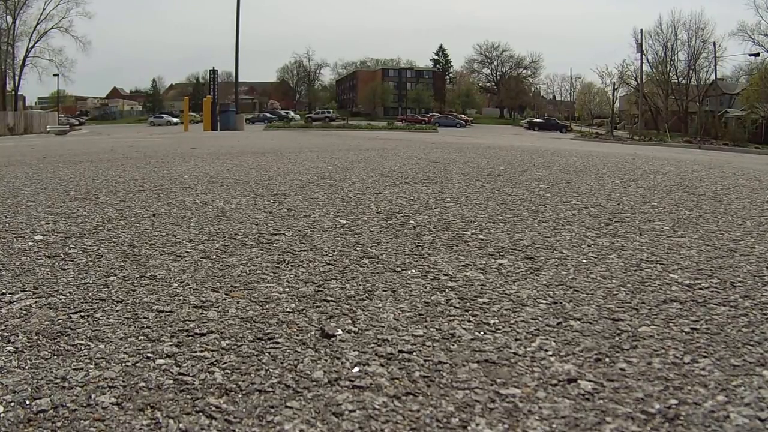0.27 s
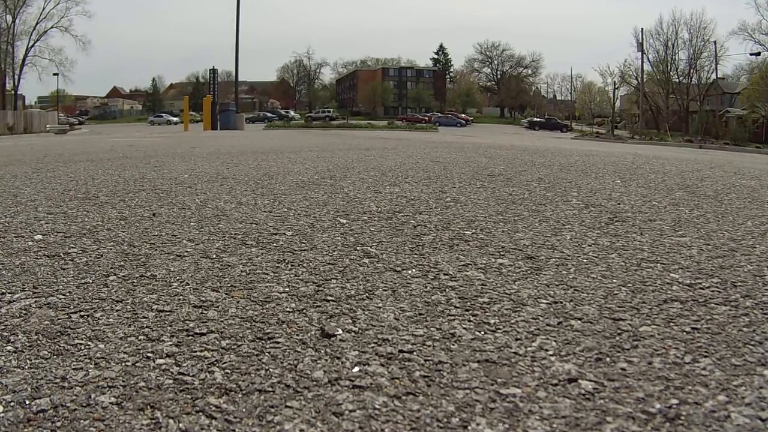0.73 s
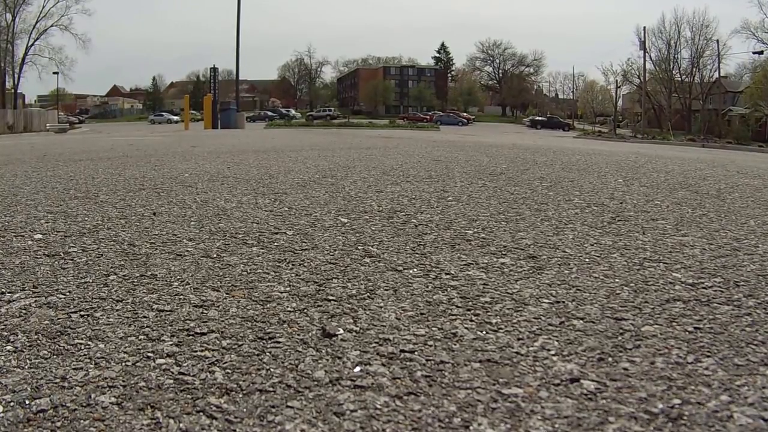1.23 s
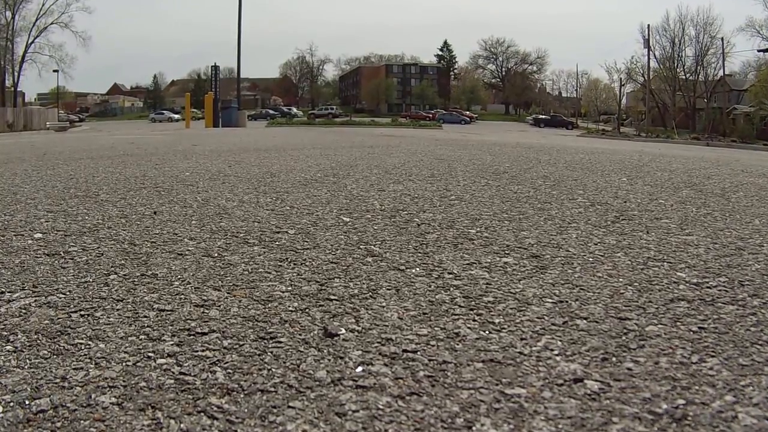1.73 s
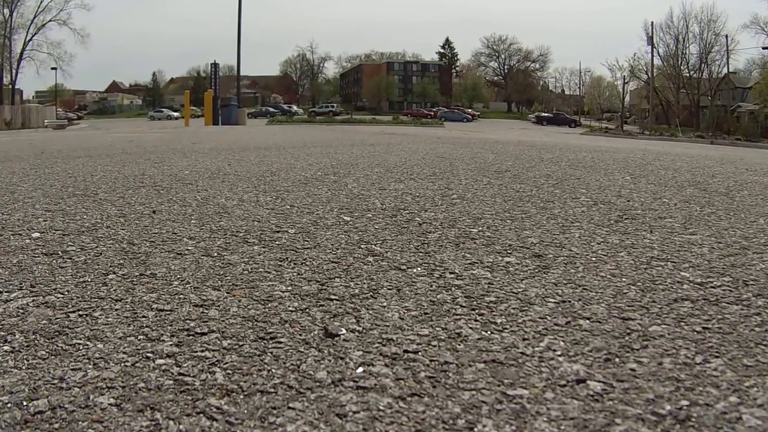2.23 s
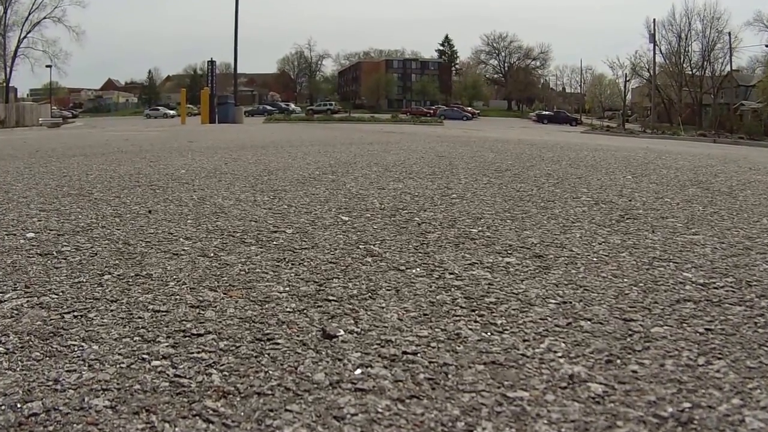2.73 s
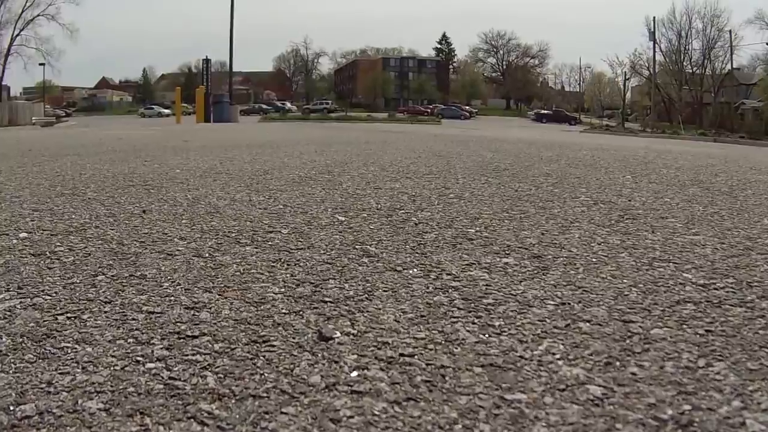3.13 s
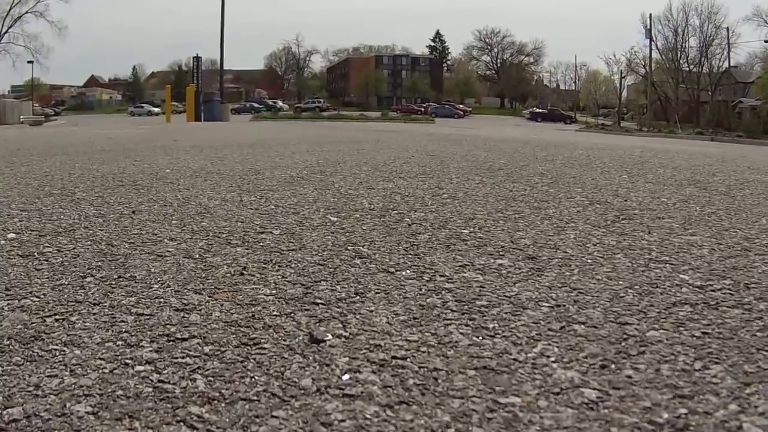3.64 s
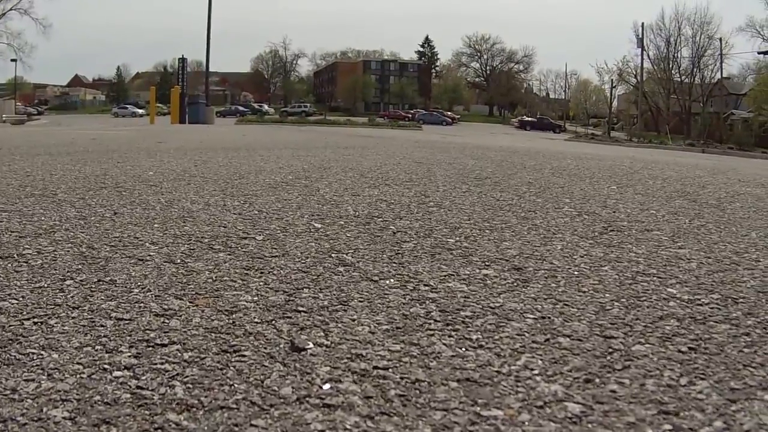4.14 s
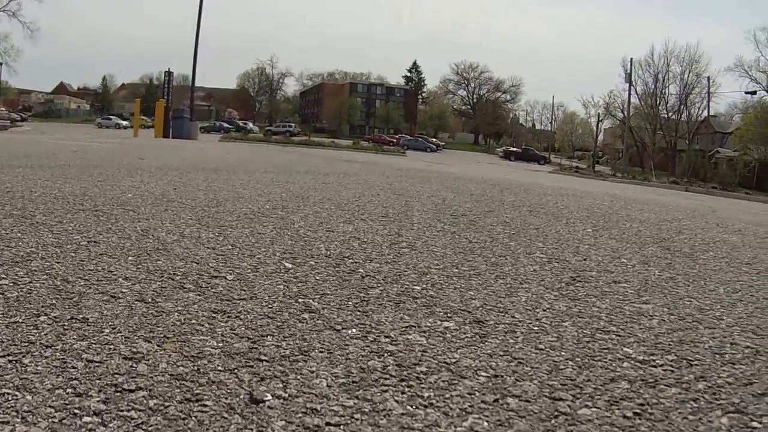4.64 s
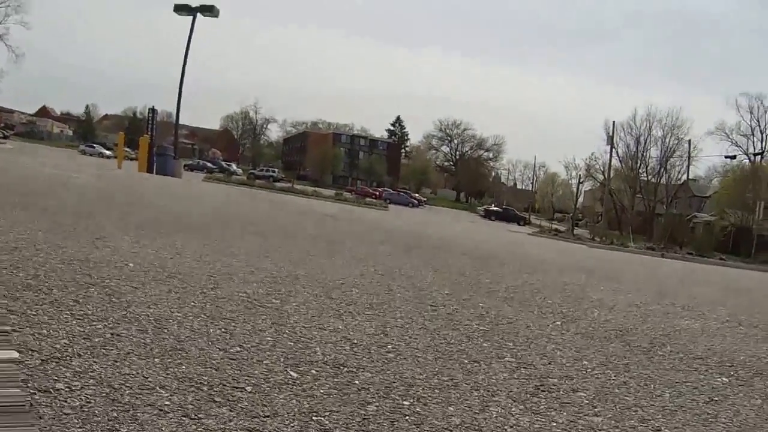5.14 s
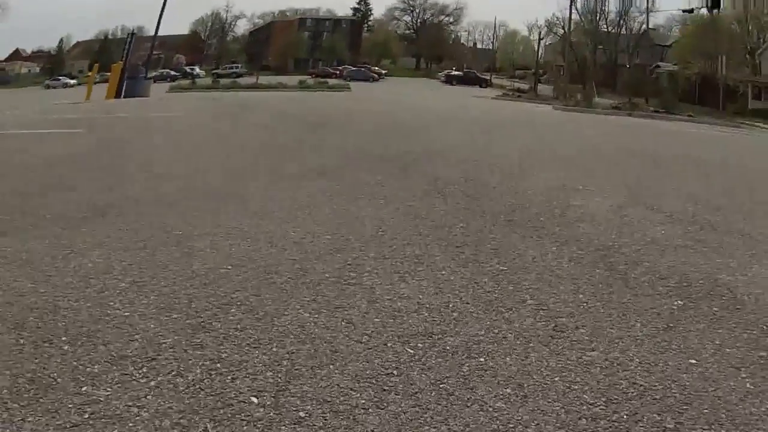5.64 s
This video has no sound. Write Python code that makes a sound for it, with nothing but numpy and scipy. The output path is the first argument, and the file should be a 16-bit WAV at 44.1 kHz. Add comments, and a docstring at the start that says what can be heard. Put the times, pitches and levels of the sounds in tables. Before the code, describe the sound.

For almost two seconds there is only faint outdoor air, with soft low puffs of breeze and very thin electronic tones. At about 1.9 seconds a quadcopter's motors switch on suddenly, right at the microphone, with a shrill whine, quick ticks and a brief grinding. From 2.4 seconds the propellers catch and spin up into a low, hissing buzz that climbs in pitch. It rises again around 3.6 seconds, turning louder and raspier as the blades' air slaps the camera. The pitch peaks at lift-off, about 4.5 seconds, then the drone wavers as the propellers beat against each other. Downwash buffets the microphone with low rumbling gusts, strongest from 4.7 to 5.4 seconds and ending in a sharp pop. The rumble then falls away, while the buzz and high whine carry on until nearly six seconds.

```python
"""An asphalt lot, where a quadcopter starts and lifts off, heard from its own camera.
Four speed controllers switch on with an 8 kHz whine; the motors step round, then spin up, and their
rotation modulates the whine into sidebands. Each pass of the nearest blade radiates a pressure pulse,
a thump, and its wake slaps the camera; the other propellers beat against it. Turbulent downwash
buffets the microphone, most just after lift-off."""
import sys
import numpy as np
from scipy import signal
from scipy.fft import rfft, irfft, next_fast_len
from scipy.io import wavfile
from scipy.ndimage import uniform_filter1d, map_coordinates

SR = 44100
rng = np.random.default_rng(int(sys.argv[2]) if len(sys.argv) > 2 else 0)


def dump(signal):
    """Clip the signal to [-1, 1] and save it as 16-bit WAV at the path in sys.argv[1]."""
    limited = np.clip(np.atleast_2d(signal).T, -1, 1)
    pcm = np.round(limited * 32767).astype(np.int16)
    wavfile.write(sys.argv[1], SR, pcm)


N = 258867

# Levels in the tables are relative. The blade rate is the number of blade passes a second.
# blade rate of the nearest propeller, creeping and then running: t/s, f/Hz
CREEP_RATE = [(1.91, 1.3), (2.0, 6.5), (2.2, 22.3), (2.3, 32), (2.36, 40), (2.4, 59)]
RUN_RATE = [(2.45, 73.4), (2.54, 90.7), (2.6, 100.4), (2.75, 117.7), (2.95, 130.9), (3.08, 135.9),
            (3.54, 145.4), (3.75, 179.6), (3.96, 195.0), (4.21, 201.5), (4.52, 219.0), (4.72, 200.5),
            (4.99, 188.2), (5.18, 167.5), (5.33, 193.2), (5.43, 172.9), (5.55, 184.5), (5.65, 183.3),
            (5.83, 199.0), (5.87, 198.6)]
# speed split between the propellers due to steering: t/s, fraction of the nearest one's speed
STEERING_SPLIT = [(2.4, .02), (4.4, .041), (4.65, .33), (4.9, .36), (5.13, .08), (5.3, .12), (5.5, .042),
                  (5.87, .022)]
# the other three propellers: share of the steering split, level/dB
FAR_ROTORS = [(-1, 1), (-.45, -8.5), (.42, -2)]
# spectra of the outdoor air, the breeze and the downwash on the microphone: f/Hz, level/dB
AIR_SPECTRUM = [(88, -33), (150, -7.5), (230, -4), (253, -10), (290, -8.5), (980, -15), (1170, -15.5),
                (1360, -16), (3650, -22), (4430, -16), (5180, -18), (7620, -17), (9250, -26),
                (11900, -14.5), (15300, -27.5)]
BREEZE_SPECTRUM = [(12, -32), (20, 0), (54, -0.5), (198, -14.5), (230, -10), (250, -10), (320, -47),
                   (550, -120)]
BUFFET_SPECTRUM = [(20, -17), (50, -4), (75, -3.5), (120, -3), (250, -5.5), (600, -16), (2000, -29.5)]
# faint electronic tones: f/Hz, level/dB
IDLE_TONES = [(1147, -57), (2400, -69.5), (4500, -68)]
# puffs of breeze before the start: t/s, level/dB
BREEZE_PUFFS = [(.01, -38.5), (.11, -41), (.216, -43), (.48, -42), (.69, -45), (.8, -41), (.92, -40.5),
                (1.125, -43.5), (1.225, -44), (1.4, -45), (1.52, -45)]
# gusts on the microphone: t/s, level/dB, half length/s, upper edge f/Hz
MIC_GUSTS = [(3.37, -21, 0.016, 200), (3.921, -42, 0.018, 150), (4.78, -20.5, 0.027, 219.9),
             (5.193, -25, 0.022, 130), (5.261, -18, 0.03, 224), (5.3648, -11, 0.0038, 1780),
             (5.372, -15, 0.0091, 1090), (5.441, -24.5, 0.007, 900)]
# spectra of the motor and air hiss and of the treble fizz: f/Hz, level/dB
RUSH_SPECTRUM = [(1900, -35), (2280, 1.5), (3500, 0.5), (4500, 2), (5050, -3), (5600, 1.5), (7000, 0.5),
                 (9000, 3.5), (11000, -9), (13000, -18)]
FIZZ_SPECTRUM = [(7000, 1), (10500, -1.5), (12000, -3.5), (15000, -5)]
# envelopes of the fizz and of the switching tone: t/s, level/dB
FIZZ_ENVELOPE = [(1.92, -69), (2.2, -43.5), (2.7, -33), (3.35, -26.5), (3.9, -33), (4.6, -47),
                 (5.22, -21.5), (5.42, -27), (5.87, -30.5)]
WHINE_ENVELOPE = [(1.95, -18), (2.0, -15.5), (2.23, -14.5), (2.4, -18.5), (2.5, -13.5), (2.62, -19.5),
                  (2.75, -16), (2.87, -22), (3.0, -20), (3.6, -23), (4.25, -29.5), (4.55, -24),
                  (5.24, -17.5), (5.27, -21.5), (5.42, -25), (5.5, -20), (5.78, -17), (5.87, -24.5)]
# grinding just before the motors catch: t/s, half length/s, level/dB
GRIND_SWELLS = [(2.195, 0.094, -33)]
# the four controllers: offset from the switching frequency f/Hz, level/dB
CONTROLLER_TONES = [(0, 0), (12.4, -13), (17.7, -19), (-5, -22)]
# sidebands of the switching tone, and cogging lines from the magnetic pull of a 14-pole motor:
# multiple of the blade rate, peak level/dB, blade rate at the peak f/Hz, fall/(dB per octave of speed)
SIDEBAND_LINES = [(-42, -13, 111, 48), (-21, -11.5, 105, 29), (-14, -15, 211, 37), (-7, -15, 157, 4),
                  (-3, -21, 130, 3), (-1, -27, 110, 14), (1, -16.5, 120, 15), (2, -16, 150, 4),
                  (3, -11.5, 130, 11), (4, -13.5, 89, 7), (5, -14.5, 91, 7), (6, -24, 130, 3),
                  (7, -20, 130, 3), (10.5, -13.5, 125, 12), (21, -7.5, 82, 14)]
COGGING_LINES = [(21.02, -8.5, 128, 14), (28.05, -12, 180, 33), (34.85, -20.5, 135, 26),
                 (42.15, -4, 98.5, 51), (63, -18, 87, 30)]
# radiation of the motor bells and frame; noise around the whine; bell clatter: f/Hz, level/dB
FRAME_RESPONSE = [(1900, -35), (2250, 0), (3300, -1), (4100, 1), (4600, -1), (5060, 11), (5450, -1),
                  (7000, 0), (8400, 1), (11000, 0), (13000, -10), (15000, -16)]
RING_SPECTRUM = [(6500, -26.5), (7500, -3), (8100, 5.5), (8700, -2), (9600, -2.5), (11000, -14),
                 (13000, -37)]
BELL_SPECTRUM = [(4300, -32), (4700, -6), (4850, -2), (5050, -3), (5300, -28), (5700, -36)]
# spectra of the wake's snap, turbulent puff and low churn: f/Hz, level/dB
SNAP_SPECTRUM = [(400, -40), (800, -6.5), (1600, 2), (2400, -2), (3500, -6), (6000, -6.5), (10000, -13),
                 (15000, -21)]
PUFF_SPECTRUM = [(400, -21), (800, -14.5), (1100, -14), (1600, 2), (2400, -1), (3500, -6.5), (6000, -13),
                 (10000, -19), (15000, -28)]
CHURN_SPECTRUM = [(30, -22), (100, 2), (250, 5.5), (600, 0.5), (880, -1), (1150, -13), (2000, -12),
                  (4000, -39)]
# eddies sweep the wake across the camera: t/s, half length/s, slap level/dB, churn level/dB
EDDIES = [(2.85, .02, -52, -30), (3.119, .045, -52, -28), (3.211, 0.03, -37, -32), (3.426, .06, -38, -31),
          (3.335, 0.037, -34, -22), (3.763, 0.067, -26, -28), (3.905, 0.034, -28.5, -52),
          (4.043, 0.049, -27.5, -48), (4.23, 0.042, -28.5, -48), (4.36, 0.037, -29.5, -56),
          (4.525, 0.042, -25.5, -48), (4.648, 0.21, -32, -40), (4.852, 0.15, -28.5, -43),
          (5.253, 0.11, -32.5, -25.5), (5.346, .06, -28, -45), (5.51, 0.098, -31, -55)]
# Fourier components of the blade's pressure pulse: multiple of the blade rate, level/dB
BLADE_PARTIALS = [(.5, -27), (1, 3), (1.5, -28.5), (2, -5), (3, -15.5), (4, -23.5), (5, -30.5), (6, -28.5)]

START_S, SWITCH_HZ, STEPS_PER_PASS = 1.91, 8057, 21  # the controllers
LIFT_OFF_S, CLEAR_S = 4.54, 5.38  # the craft leaves the ground; it climbs out of its own downwash
IN_STEP_S = 5.67  # the propellers' beat peaks here
BAND_LIMIT_HZ = 15350


def amp(db):
    """Amplitude ratio of a level in decibels."""
    return 10 ** (np.asarray(db) / 20)


def unit(x):
    """Normalisation to rms 1."""
    return x / np.sqrt(np.mean(x ** 2) + 1e-20)


def clock():
    """Seconds at each sample."""
    return np.arange(N) / SR


def curve(rows):
    """Linear interpolation of (t/s, value) points at each sample."""
    return np.interp(clock(), *np.transpose(rows))


def ramp(start_s, length_s):
    """A linear rise from 0 to 1."""
    return np.clip((clock() - start_s) / length_s, 0, 1)


def wobble(knots_per_s):
    """A smooth random curve through Gaussian knots."""
    return map_coordinates(rng.standard_normal(int(N * knots_per_s / SR) + 4), [clock() * knots_per_s])


def swell(s, half_length):
    """A Gaussian envelope centred on time s."""
    return np.exp(-np.minimum(((clock() - s) / half_length) ** 2, 50))


def swells(base, rows):
    """Power addition of a base gain and (t/s, half length/s, level/dB) swells."""
    return np.sqrt(base ** 2 + sum((amp(db) * swell(s, half)) ** 2 for s, half, db in rows))


def decays(impulses, tau_s):
    """Exponential relaxation after each impulse."""
    return signal.lfilter([1], [1, -np.exp(-1 / (tau_s * SR))], impulses)


def filtered(x, response):
    """Filtering as multiplication of the spectrum by a frequency response."""
    size = next_fast_len(N + 8192)
    return irfft(rfft(x, size) * response(np.fft.rfftfreq(size, 1 / SR)), size)[:N]


def coloured(x, points):
    """Filtering through (f/Hz, level/dB) points on a logarithmic frequency axis."""
    f, db = np.transpose(points)
    return filtered(x, lambda hz: amp(np.interp(np.log(hz + 1), np.log(f), db)))


def noise(points):
    """Coloured noise of rms 1."""
    return unit(coloured(rng.standard_normal(N), points))


def cycles(rate):
    """Phase in cycles is the time integral of frequency."""
    return np.cumsum(rate) / SR


def blade_gate(passes, width, scatter_db):
    """Amplitude modulation of rms 1: a swell of random size at each blade pass."""
    size = amp(scatter_db * rng.standard_normal(2048))[np.round(passes).astype(int)]
    return unit(size * np.exp(-(np.sin(np.pi * passes) / width) ** 2))


def with_speed(rate, top_db, knee_hz, steep):
    """A power law of the blade rate that saturates above the knee."""
    return amp(top_db) / np.sqrt(1 + (knee_hz / (rate + 1)) ** steep)


def flight(aloft_db, clear_db):
    """A gain that shifts once at lift-off and again clear of the ground."""
    return amp(aloft_db * ramp(LIFT_OFF_S, .17) + clear_db * ramp(CLEAR_S, .19))


def far_gain():
    """The far rotors gain on the nearest as the craft rises."""
    return amp(-26) * flight(aloft_db=11, clear_db=7)


def background():
    """The noise floor: outdoor air, puffs of breeze and thin tones that end during spin-up."""
    tones = sum(amp(db + 3) * np.sin(2 * np.pi * hz * clock()) for hz, db in IDLE_TONES)
    hiss = amp(-52) * noise([(9500, -18), (11300, -7), (12100, 4), (13200, -28), (15000, -14)])
    air = amp(-46.5) * noise(AIR_SPECTRUM)
    breeze = swells(amp(-52), [(s, .036, db) for s, db in BREEZE_PUFFS]) * noise(BREEZE_SPECTRUM)
    return air + hiss + tones * (1 - ramp(2.18, .38)) + breeze


def downwash(rate):
    """Turbulent pressure on the microphone: buffeting that dies in free air, and single gusts."""
    level = with_speed(rate, top_db=-34.5, knee_hz=50, steep=6.9) * flight(aloft_db=7.5, clear_db=-24)
    wind = level * amp(3.7 * wobble(14)) * noise(BUFFET_SPECTRUM) * ramp(2.357, .11)
    for s, db, half, edge_hz in MIC_GUSTS:
        band = lambda hz: hz / np.hypot(hz, .17 * edge_hz) / (1 + (hz / edge_hz) ** 8)
        wind += amp(db) * unit(filtered(rng.standard_normal(N), band)) * swell(s, half)
    return wind


def rush(rate, passes):
    """Broadband motor and flow noise grows with speed and is amplitude-modulated by the blades."""
    pulsed_share = .69 * ramp(2.3, .63)
    gate = blade_gate(passes, width=.67, scatter_db=1.5)
    pulse = np.sqrt(1 - pulsed_share + pulsed_share * gate ** 2)
    flutter = amp(1.9 * wobble(18))
    flow = with_speed(rate, top_db=-27.5, knee_hz=53, steep=1.74) * flight(aloft_db=-3, clear_db=1.5)
    hiss = swells(flow, GRIND_SWELLS) * noise(RUSH_SPECTRUM)
    fizz = amp(curve(FIZZ_ENVELOPE)) * noise(FIZZ_SPECTRUM)
    return (hiss + fizz) * pulse * flutter * ramp(START_S, .011)


def bell_clatter(rate):
    """Resonance: the motor bells ring loudest when shaken at a blade rate near 78 Hz."""
    shake = np.exp(-((rate - 78) / 37) ** 2)
    return amp(-42.5 + 8 * shake + 3.2 * wobble(60)) * noise(BELL_SPECTRUM) * ramp(START_S, .14)


def controller_whine(passes):
    """Four close switching tones beat; at first each commutation ticks and briefly cuts the current."""
    tones = sum(amp(db) * np.sin(2 * np.pi * (SWITCH_HZ + offset) * (clock() - 2))
                for offset, db in CONTROLLER_TONES)
    steps = np.diff(np.floor(STEPS_PER_PASS * passes), prepend=0)
    creeping = 1 - ramp(1.842, .26)
    current = 1 - .57 * creeping * np.tanh(decays(steps, tau_s=.0073))
    whine = amp(curve(WHINE_ENVELOPE) + 5 + 3.2 * creeping) * tones * current * ramp(START_S, .00076)
    steps[round(START_S * SR)] = 1  # switching on ticks too
    ticks = amp(-23) * creeping * decays(steps, tau_s=.0023) * noise(RUSH_SPECTRUM)
    return whine + ticks


def motor_lines(rate):
    """Rotation modulates the switching tone and adds cogging lines; each line peaks at one speed."""
    passes = cycles(rate) + .0043 * wobble(70)
    octaves = np.log2(np.maximum(rate, 89))  # below 89 Hz the lines keep their balance

    def lines(rows, carrier):
        return sum(amp(db - fall * np.abs(octaves - np.log2(peak_hz)) + 1.7 * wobble(14))
                   * np.sin(2 * np.pi * (carrier + k * passes)) for k, db, peak_hz, fall in rows)
    return np.sqrt(2) * np.array([lines(SIDEBAND_LINES, SWITCH_HZ * clock()), lines(COGGING_LINES, 0)])


def motors(rate, far_rotors):
    """Forced vibration: four motors radiate through the frame; sidebands follow the whine's level."""
    far = sum(amp(db) * motor_lines(speed) for speed, db in far_rotors)
    sidebands, cogging = motor_lines(rate) + amp(1) * far_gain() * far
    sideband_gain = amp(-14 + .55 * curve(WHINE_ENVELOPE))
    cogging_gain = amp(-26) * flight(aloft_db=-5.5, clear_db=4.5)
    radiated = coloured(sideband_gain * sidebands + cogging_gain * cogging, FRAME_RESPONSE)
    ring = sideband_gain * amp(-9) * noise(RING_SPECTRUM)
    return (radiated + ring) * ramp(START_S, .14)


def wake_slaps(rate, passes):
    """Wake impingement: each blade's wake hits the camera with a double snap, a puff and a low churn."""
    swung_away = amp(-11 * ramp(5.58, .043))  # the wake swings off the camera
    slap_base = with_speed(rate, top_db=-33, knee_hz=99.57, steep=2.8) * swung_away
    churn_base = with_speed(rate, top_db=-38, knee_hz=107, steep=1.7)
    slap_gain = swells(slap_base, [(s, half, db) for s, half, db, _ in EDDIES])
    churn_gain = swells(churn_base, [(s, half, db) for s, half, _, db in EDDIES])
    jitter_cycles = .005 * amp(14 * ramp(4.95, .25))  # grows as the craft tips into its downwash

    def impulses(delay_cycles):
        count = np.floor(passes - delay_cycles + jitter_cycles * wobble(200))
        return (np.diff(count, prepend=0) > 0) * amp(3.5 * wobble(120))
    # the tip vortex arrives at a wandering delay, so a comb filter sweeps through the rasp
    drift = .043 * wobble(14)
    strikes = impulses(0) + .5 * impulses(drift - .11)
    ground_snap = unit(coloured(strikes, SNAP_SPECTRUM))
    aloft_snap = unit(coloured(strikes, [(.85 * hz, db) for hz, db in SNAP_SPECTRUM]))
    risen = ramp(LIFT_OFF_S - .12, .09)
    snap = -((1 - risen) * ground_snap + risen * aloft_snap)
    puff = noise(PUFF_SPECTRUM) * unit(1.5 + blade_gate(passes, width=.88, scatter_db=3))
    # stronger slaps are more alike: more snap, less turbulence
    snap_share = np.clip(.79 + .16 * (20 * np.log10(slap_gain) + 34), .3, .95)
    slap = amp(1.5) * np.sqrt(snap_share) * snap + amp(3.5) * np.sqrt(1 - snap_share) * puff
    thuds = -unit(coloured(impulses(drift), CHURN_SPECTRUM))
    swirl = noise(CHURN_SPECTRUM) * blade_gate(passes, width=1, scatter_db=4.5)
    churn = np.sqrt(.62) * thuds + np.sqrt(.38) * swirl
    return (slap_gain * slap + churn_gain * churn) * ramp(2.5, .048)


def blade_pressure(rate, lag_cycles):
    """Fourier series of the pulse under a passing blade, sharper at low speed and in free air."""
    passes = cycles(rate) + .006 * wobble(60) - lag_cycles
    tilt = (170 / np.clip(rate, 85, 400)) ** .83 * flight(aloft_db=0, clear_db=2.5)  # gain per octave
    tilt *= amp(2.4 * wobble(7))
    partials = [(k, amp(db) * tilt ** np.log2(max(k, 1))) for k, db in BLADE_PARTIALS]
    wave = sum(gain * np.cos(2 * np.pi * k * passes - np.pi / 4) for k, gain in partials)
    return wave / np.sqrt(sum(gain ** 2 for _, gain in partials))


def propellers(rate, far_rotors):
    """Superposition: the nearest propeller's pulses dominate and the other three beat against them."""
    lag_cycles = .13  # the thump trails the slap
    lead = lambda speed: np.interp(IN_STEP_S, clock(), cycles(speed - rate))
    far = sum(amp(db) * blade_pressure(speed, lag_cycles + lead(speed)) for speed, db in far_rotors)
    near = blade_pressure(rate, lag_cycles) * amp(.29 * wobble(40))
    level = with_speed(rate, top_db=-11, knee_hz=111.7, steep=7) * flight(aloft_db=-3, clear_db=.5)
    return level * (near + far_gain() * far) * ramp(2.35, .042)


def scene():
    """One blade rate drives the blades, hiss, motor tones and downwash; their pressures add."""
    rate = curve(list(CREEP_RATE) + list(RUN_RATE)) * (clock() > START_S)
    rate = np.abs(uniform_filter1d(rate, size=1800))  # the rotor's inertia
    split = curve(STEERING_SPLIT)
    far_rotors = [(rate * (1 + share * split + .004 * wobble(5)), db) for share, db in FAR_ROTORS]
    passes = cycles(rate)
    blades = propellers(rate, far_rotors) + wake_slaps(rate, passes) + rush(rate, passes)
    drive = controller_whine(passes) + motors(rate, far_rotors) + bell_clatter(rate)
    return (blades + drive + downwash(rate) + background())[None]


def record(dry):
    """Saturation and band limiting: the camera clips at full scale, then cuts the highest treble."""
    return filtered(np.clip(dry[0], -1, 1), lambda hz: hz < BAND_LIMIT_HZ)[None]


dry = scene()
out = record(dry)
dump(out)
```